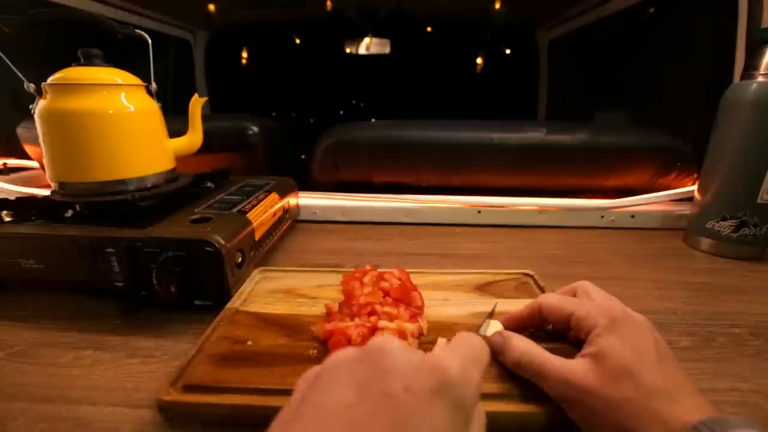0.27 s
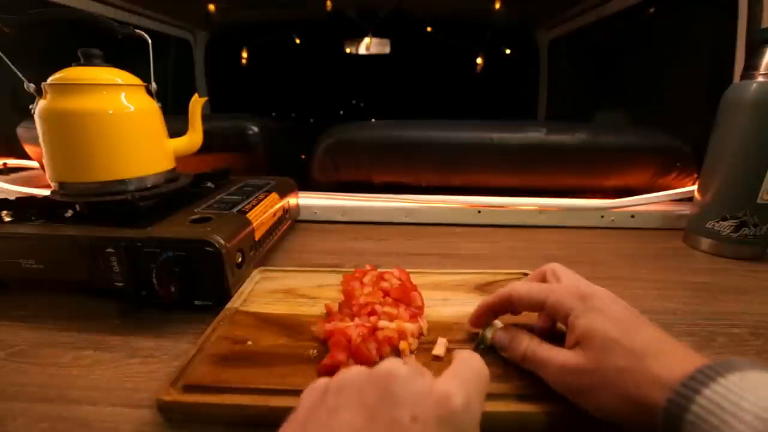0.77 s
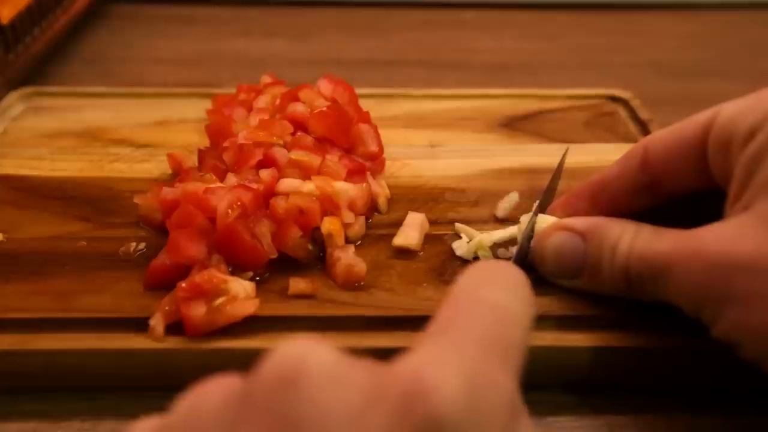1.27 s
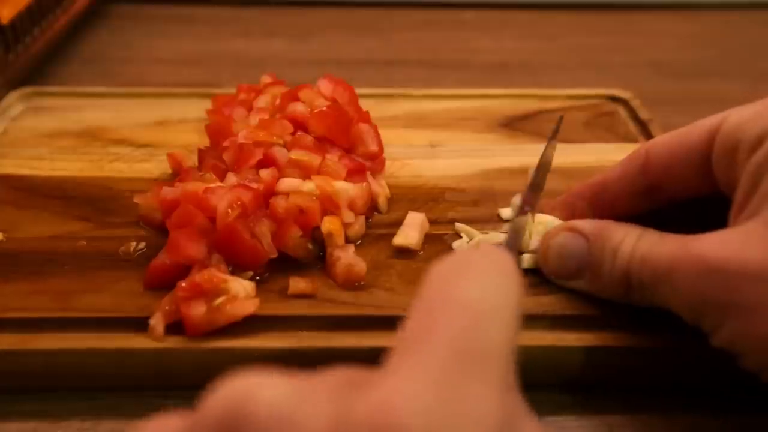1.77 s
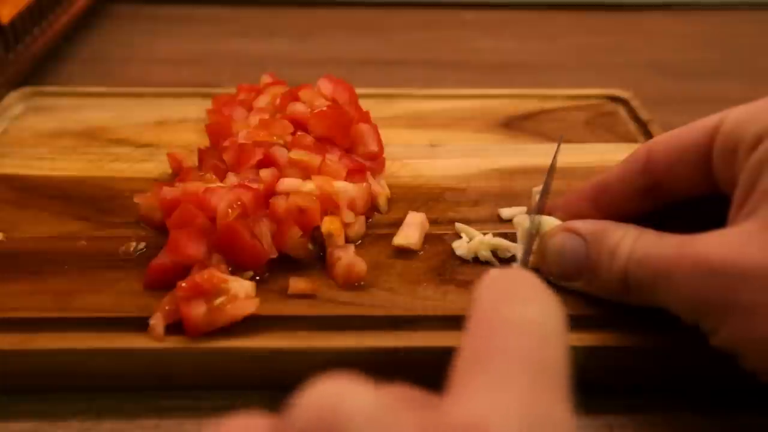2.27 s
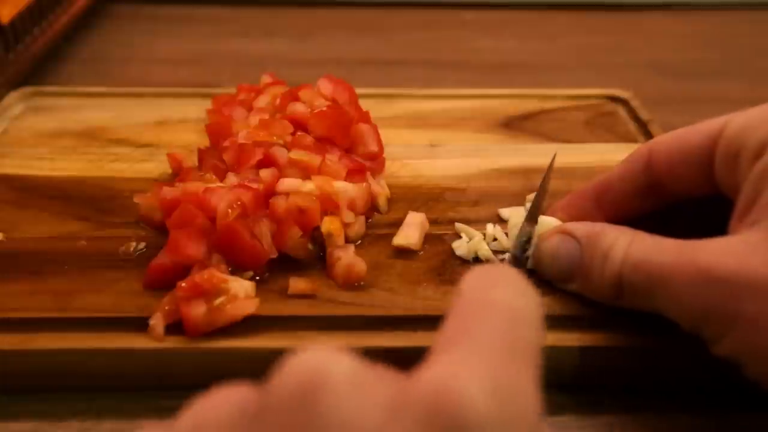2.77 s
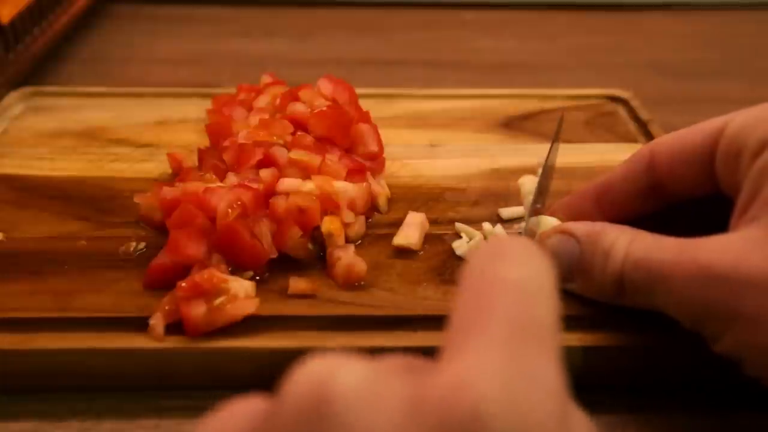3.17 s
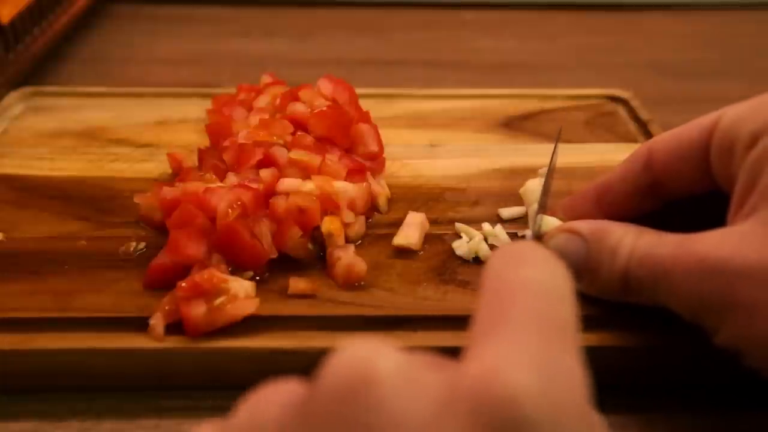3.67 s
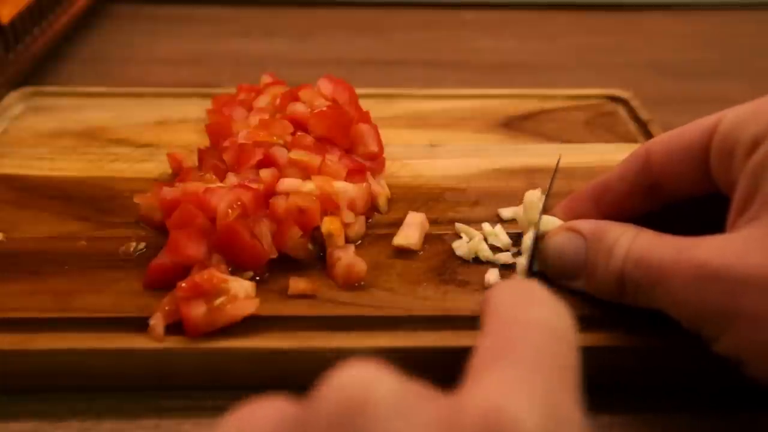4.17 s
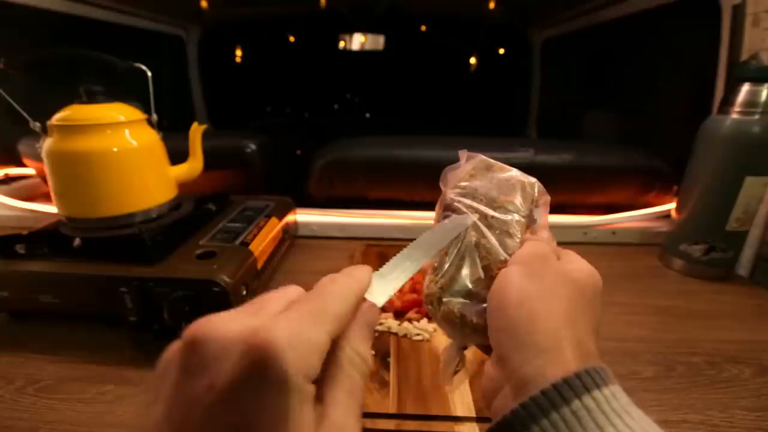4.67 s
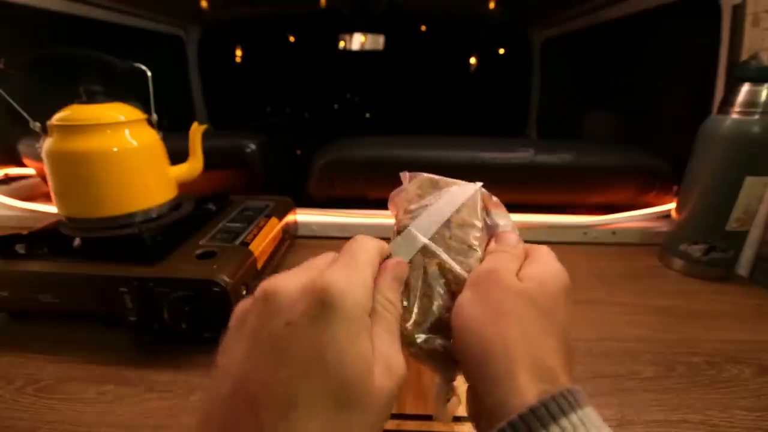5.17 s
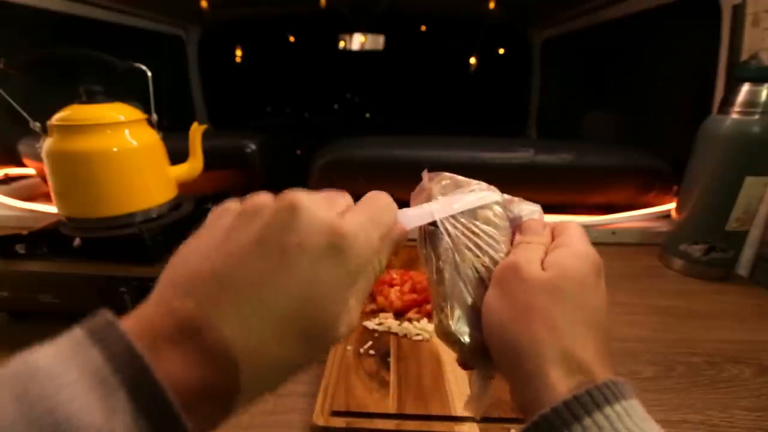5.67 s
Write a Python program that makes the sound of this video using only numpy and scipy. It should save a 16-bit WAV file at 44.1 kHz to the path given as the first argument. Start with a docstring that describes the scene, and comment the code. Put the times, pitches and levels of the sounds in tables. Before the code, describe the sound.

Heavy rain drums steadily on a van roof while a knife knocks sharply on a wooden board, then snaps and rasps into a crinkling plastic bag.

```python
"""Inside the small padded cabin of a parked van, heavy rain drums on the metal roof.
The rain is random impacts that ring damped panels, over a wash of noise.
Close by, a knife crunches through garlic (swells of tiny breaks) and knocks four times on a wooden
board (damped modes and noise bursts). Then the blade snaps and rasps into a plastic food bag, which
crinkles in the hand: flutter bursts with ringing crease, skin and blade, repeated fast in the rasp."""
import sys
import numpy as np
from scipy import signal
from scipy.fft import rfft, irfft
from scipy.io import wavfile

SR = 44100
rng = np.random.default_rng(int(sys.argv[2]) if len(sys.argv) > 2 else 0)


def materialize(psi):
    """Save the field psi as 16-bit PCM at rate SR to the path in sys.argv[1].

    A 1-D psi becomes a single channel; in a 2-D psi each row is a channel.
    """
    bounded = np.clip(np.atleast_2d(psi).T, -1, 1)
    quanta = np.round(bounded * 32767).astype(np.int16)
    wavfile.write(sys.argv[1], SR, quanta)


N = 261513  # length in samples

# spectrum of rain heard through roof and lining: frequency_hz, relative_level_db
ROOF_SPECTRUM = [(30, -30), (90, -23.5), (200, -13), (450, -3), (700, 0.5), (1020, .5), (1500, -6),
                 (2200, -3), (2600, -0.5), (3100, -8), (4200, -19.5), (5000, -26.5), (8000, -37.5),
                 (15500, -45)]
# strength of the shower: time_s, level_db
SHOWER_LEVEL = [(0.0, -37), (2.29, -38), (2.94, -37), (5.05, -39), (5.93, -37)]
# reflections from worktop, window and roof: delay_s, relative_gain
ECHOES = [(.0014, 0.19), (.0031, -0.43), (.0062, .25), (.0084, 0.18)]
# cabin reverberation, nominal decay by 60 dB: frequency_hz, t60_s
CABIN_DECAY = [(100, 0.37), (400, 0.16), (2500, 0.12), (6000, 0.17), (14000, .16)]

# modes of the cutting board on the worktop: frequency_hz, relative_level_db, t60_s
BOARD_MODES = [(336, -9, 0.2), (480, -6.5, 0.1), (576, 2, 0.07), (708, -2, 0.083), (836, -1, 0.057),
               (890, 2, 0.075), (1070, 5, 0.028), (1163, -3.5, 0.06), (1340, -1, 0.074), (1416, 0.5, 0.048),
               (1595, 7, 0.07), (1730, 2, 0.067), (1760, 1.5, 0.061), (1880, 10, 0.078), (2040, 7, .1),
               (2182, 3, 0.14), (2256, -2, 0.048), (2330, -9, 0.026), (2626, 1, .07), (2970, -5, 0.059),
               (3484, -4, 0.079), (4500, -18, .04)]
# spectrum of the blade's clack: frequency_hz, relative_level_db
CLACK_SPECTRUM = [(100, -41.5), (400, -16.5), (1100, -11), (1600, -15.5), (2100, -1), (2500, 3.5),
                  (2900, -7), (3900, -16.5), (5000, -38.5), (8000, -71), (16000, -46)]
# spectrum of the dull push into the worktop: frequency_hz, relative_level_db
THUD_SPECTRUM = [(25, -18), (70, -4), (200, -6.5), (400, 10.5), (900, -41), (4000, -65)]
# spectrum of the steel edge biting into wood: frequency_hz, relative_level_db
BITE_SPECTRUM = [(200, -18), (1500, 6), (3400, -7), (4500, 4.5), (5700, -0.5), (6500, -11), (8000, -13),
                 (11000, -24), (16000, -33)]
# blows on the board: start_s, board_db, board_tilt_db_per_octave, clack_db, thud_db, bite_db
BLOWS = [(0.4054, 12, .5, 22.5, -2.5, -13), (1.2293, 29.5, -2.3, 22.5, 3, 2.5),
         (1.2366, 12, 8, 14.5, 4, -18), (1.302, 2, -3, 4, -6, -25), (2.5216, 18, -0.5, 24.5, 0.5, -14),
         (3.9456, 14, -1.5, 12.5, -4, -20), (5.2752, 11, -3, 6, -7, -15)]

# spectrum of crisp breaks in garlic: frequency_hz, relative_level_db
GARLIC_SPECTRUM = [(200, -45), (1200, -10), (2500, 8.5), (4000, 1.5), (5500, -3.5), (7500, -11),
                   (11000, -13), (16000, -26)]
# garlic breaking under the blade: start_s, level_db, tilt_db_per_octave
GARLIC_CRACKS = [(2.189, -23.5, 3), (2.4803, -28, 7), (3.3453, -14, -4), (3.5535, -5.5, 0),
                 (3.6735, -20, 5), (4.1057, -21.5, 2), (4.1311, -30, 6), (4.3015, -2.5, -1.5)]
# the blade crunches down through the clove before each blow, louder before a hard one
SLICE_S, SLICE_RE_CLACK_DB, SLICE_TILT_DB = .07, -86, 4  # tilt in dB per octave
# one slow cut through a tough clove
SLOW_CUT_AT_S, SLOW_CUT_S, SLOW_CUT_DB = 3.53, .43, -62

# spectrum of taut plastic film giving way: frequency_hz, relative_level_db
FILM_SPECTRUM = [(80, -54), (170, -34), (280, -19), (420, -16), (850, -5.5), (1250, -6.5), (2000, -3.5),
                 (2600, 0.5), (3500, -2), (4400, -7), (5600, -11), (8000, -21.5), (12500, -28),
                 (16000, -39)]
# modes of the blade, damped by the hand and the film: frequency_hz, relative_level_db, t60_s
BLADE_MODES = [(2722, -10, .1), (3123, -11, .1), (3391, -12, .11), (3659, -8, .13), (4228, -13, .12),
               (5200, -19, .08)]
# modes of the taut bag as a drum skin: frequency_hz, relative_level_db, t60_s
SKIN_MODES = [(892, -9.5, 0.056), (1560, -8, .03), (2497, -1.5, 0.014)]
# the bag snapping at the knife point and in the hand:
# start_s, level_db, tilt_db_per_octave, crease_pitch_hz
BAG_SNAPS = [(4.6564, 6, -2.5, 3100), (4.6638, 6.5, -3, 3100), (4.6812, 15.5, -1, 2800),
             (5.058, -6, -1, 3500), (5.0915, -8.5, 1, 3780), (5.295, -5, -3, 3600), (5.343, -6.5, -5, 4600),
             (5.41, 2.5, 2.5, 5200), (5.854, -9, 0, 4530), (5.8631, -2.5, 1, 3860)]
# a brighter snap rings its crease harder and its taut skin less
CREASE_DB_PER_TILT, SKIN_DB_PER_TILT = 1.5, -2
# the film crinkles around each snap, a little more around a strong one
CRINKLE_LEAD_S, CRINKLE_S, CRINKLE_TILT_DB = .014, .055, -3.5
CRINKLE_DB, CRINKLE_DB_PER_DB = -48, .15  # level beside a 0 dB snap; rise per dB of snap
# one pull of the blade through the film: it speeds up, holds, then breaks free and trails off
PULL_AT_S, SPEED_UP_S, PULL_S, TRAIL_S = 4.8583, .049, .071, .035
FIRST_SLIPS_PER_S, TOP_SLIPS_PER_S = 122, 315
# fast slips are smaller than slow ones
PULL_DB, FAST_SLIP_DB, BREAK_FREE_DB, TRAIL_DB_PER_S = 10.3, -3, -9, -300
# the bag's drum note, slack and pulled tight
SLACK_HZ, TIGHT_HZ, SLACK_DB, TIGHT_DB = 215, 285, -9, 3

EDGE_HZ = 16200  # upper band limit


def amp(db):
    """Level: converts decibels to an amplitude ratio."""
    return 10 ** (np.asarray(db) / 20)


def unit(x):
    """Normalisation: scales a signal to an rms of 1."""
    return x / np.sqrt(np.mean(x ** 2) + 1e-20)


def read(points, hz):
    """Interpolation: reads a table along a logarithmic frequency axis."""
    f, value = np.transpose(points)
    return np.interp(np.log(hz + 1), np.log(f + 1), value)


def add(mix, start_s, sound):
    """Superposition: adds a sound into the mix, in place, from its start time."""
    part = mix[max(round(start_s * SR), 0):][:len(sound)]
    part += sound[:len(part)]


def click(spectrum, tilt_db=0, size=4096):
    """Minimum phase: the causal pulse with a given spectrum, tilted in dB per octave about 3.5 kHz."""
    hz = abs(np.fft.fftfreq(size, 1 / SR))
    octaves = np.log2(np.maximum(hz, 500) / 3500)  # the tilt stops below 500 Hz
    log_gain = np.log(amp(read(spectrum, hz) + tilt_db * octaves))
    # the Hilbert transform of the log gain supplies the phase
    response = np.exp(np.conj(signal.hilbert(log_gain)))
    return np.fft.ifft(response).real[:size // 2]


def patter(length, per_s, spread_db):
    """Random point process: impulses of either sign, uneven in size, at a mean rate."""
    size = amp(spread_db * np.minimum(rng.exponential(1, length), 4))
    sign = rng.choice([-1, 1], length)
    struck = rng.random(length) < per_s / SR
    return size * sign * struck


def scatter(t60, size=4096):
    """Diffuse decay: a dense dying burst of energy 1 that favours no pitch; t60 is nominal."""
    age = np.arange(size) / SR / t60
    burst = rng.standard_normal(size) * np.exp(-np.log(1000) * age)
    # keep only the phase, which flattens the spectrum, then fade what is left late
    flat = irfft(np.exp(1j * np.angle(rfft(burst))))
    faded = flat * np.exp(-(2 * age) ** 2)
    return faded / np.linalg.norm(faded)


def burst(spectrum, t60, tilt_db=0):
    """Excitation and response: a coloured pulse smeared into a short diffuse decay."""
    return signal.fftconvolve(click(spectrum, tilt_db), scatter(t60))


def ring(modes, tilt_db=0, rise_s=0.0003):
    """Modal superposition: one impulse sets off damped modes, neighbours in opposite senses."""
    t = np.arange(SR // 4) / SR
    hz, db, t60 = np.transpose(modes)[:, :, None]
    decay = np.log(1000) / t60
    # height grows with damping, so that a level sets the spectral peak; tilt turns about 1 kHz
    height = amp(db + tilt_db * np.log2(hz / 1000)) * 2 * decay / SR
    sense = np.where(np.arange(len(hz)) % 2, -1, 1)
    swings = height * np.exp(-decay * t) * np.sin(2 * np.pi * hz * t)
    return sense @ swings * (1 - np.exp(-t / rise_s))


def crackle(length_s, db, spectrum, tilt_db, grains_per_s, spread_db):
    """Granular fracture: a swell of tiny breaks in one material."""
    n = round(length_s * SR)
    impulses = patter(SR, grains_per_s, spread_db)[:n]
    grains = signal.fftconvolve(impulses, click(spectrum, tilt_db))[:n]
    return amp(db) * unit(grains) * signal.windows.tukey(n, .6)


def rain(drops_per_s=260, spread_db=2.5, panel_t60=0.032, wash_db=-2, count=12):
    """Impact excitation of damped panels, each ringing its own way, over a wash of countless small drops."""
    t = np.arange(SR // 8) / SR
    drops = np.zeros(N)
    for _ in range(count):
        panel = rng.standard_normal(len(t)) * np.exp(-np.log(1000) * t / panel_t60)
        impacts = patter(N + len(t), drops_per_s, spread_db)
        drops += signal.oaconvolve(impacts, unit(panel), "valid")[:N]
    drumming = unit(drops) + amp(wash_db) * rng.standard_normal(N)
    inside = signal.oaconvolve(drumming, click(ROOF_SPECTRUM))[:N]
    level_db = np.interp(np.arange(N) / SR, *np.transpose(SHOWER_LEVEL))
    return unit(inside) * amp(level_db)


def cabin(x, echo_db, tail_db, gap_s=.005):
    """Room response: close reflections and a short tail, whose decay depends on frequency."""
    longest = max(t60 for _, t60 in CABIN_DECAY)
    hz, t, z = signal.stft(scatter(longest, size=16384), SR, nperseg=256)
    # the tail already dies at the longest rate: add only the remaining damping
    damping = np.log(1000) * (1 / read(CABIN_DECAY, hz) - 1 / longest)
    tail = signal.istft(z * np.exp(-damping[:, None] * t), SR, nperseg=256)[1]
    response = signal.unit_impulse(len(tail))  # the direct sound
    add(response, gap_s, amp(tail_db) * tail / np.linalg.norm(tail))
    for delay_s, gain in ECHOES:
        add(response, delay_s, amp(echo_db) * np.array([gain]))
    return signal.oaconvolve(x, response)[:N]


def garlic(break_t60=.008, grains_per_s=600, spread_db=3.5):
    """Brittle fracture: the clove crunches softly under the blade and now and then splits with a crack."""
    def crunch(length_s, db):
        """Granular fracture: a swell of breaks in the clove."""
        return crackle(length_s, db, GARLIC_SPECTRUM, SLICE_TILT_DB, grains_per_s, spread_db)

    out = np.zeros(N)
    add(out, SLOW_CUT_AT_S, crunch(SLOW_CUT_S, SLOW_CUT_DB))
    for start_s, _, _, clack_db, _, _ in BLOWS:
        add(out, start_s - SLICE_S, crunch(SLICE_S, clack_db + SLICE_RE_CLACK_DB))
    for start_s, db, tilt_db in GARLIC_CRACKS:
        add(out, start_s, amp(db) * burst(GARLIC_SPECTRUM, break_t60, tilt_db))
    return out


def knocks(chatter_t60=0.027, thud_t60=.11, bite_t60=0.034):
    """Impact: the edge bites the wood, the blade chatters, the board rings and the worktop thuds."""
    out = np.zeros(N)
    # a hard chop lands twice, tip then heel, and settles with a light tap;
    # the last blow is a soft bump of the hand
    for start_s, board_db, tilt_db, clack_db, thud_db, bite_db in BLOWS:
        add(out, start_s, amp(board_db) * ring(BOARD_MODES, tilt_db, rise_s=0.0012))
        add(out, start_s, amp(clack_db) * burst(CLACK_SPECTRUM, chatter_t60))
        add(out, start_s, amp(thud_db) * burst(THUD_SPECTRUM, thud_t60))
        add(out, start_s, amp(bite_db) * burst(BITE_SPECTRUM, bite_t60))
    return out


def snap(tilt_db, skin_db, blade_db, crease_hz, crease_db, crease_t60, flutter_t60=0.0042):
    """Release of tension: the film flutters briefly; the crease, the taut skin and the blade ring."""
    skin = amp(skin_db) * ring(SKIN_MODES)
    blade = amp(blade_db) * ring(BLADE_MODES)
    out = skin + blade + ring([(crease_hz, crease_db, crease_t60)])
    add(out, 0, burst(FILM_SPECTRUM, flutter_t60, tilt_db))
    return out


def bag(crease_db=0, crease_t60=.005):
    """Buckling film: it crinkles and gives way in single snaps; the bright ones barely move the bag."""
    out = np.zeros(N)
    for start_s, db, tilt_db, crease_hz in BAG_SNAPS:
        sound = snap(tilt_db, skin_db=-2 + SKIN_DB_PER_TILT * tilt_db, blade_db=-7, crease_hz=crease_hz,
                     crease_db=crease_db + CREASE_DB_PER_TILT * max(tilt_db, 0), crease_t60=crease_t60)
        add(out, start_s, amp(db) * sound)
        crinkle_db = CRINKLE_DB + CRINKLE_DB_PER_DB * db
        crinkle = crackle(CRINKLE_S, crinkle_db, FILM_SPECTRUM, CRINKLE_TILT_DB,
                          grains_per_s=700, spread_db=4)
        add(out, start_s - CRINKLE_LEAD_S, crinkle)
    return out


def rasp(uneven_db=1, tilt_db=0.25, drum_t60=.022):
    """Stick-slip: each slip snaps the film and drums the bag, whose pitch rises as it is pulled tight."""
    out, t = np.zeros(N), 0
    while t < PULL_S + TRAIL_S:
        tension = min(t / SPEED_UP_S, 1)
        free_s = max(t - PULL_S, 0)  # time since the blade broke free
        level_db = PULL_DB + FAST_SLIP_DB * tension
        level_db += BREAK_FREE_DB * (free_s > 0) + TRAIL_DB_PER_S * free_s
        drum_hz = SLACK_HZ + (TIGHT_HZ - SLACK_HZ) * tension
        drum_db = SLACK_DB + (TIGHT_DB - SLACK_DB) * tension
        slip = snap(tilt_db, skin_db=7.5, blade_db=2, crease_hz=3290, crease_db=1.5, crease_t60=0.006)
        slip += ring([(drum_hz, drum_db, drum_t60)], rise_s=0.006)
        add(out, PULL_AT_S + t, amp(level_db + uneven_db * rng.standard_normal()) * slip)
        speed = tension * (1 - free_s / TRAIL_S)
        t += 1 / (FIRST_SLIPS_PER_S + (TOP_SLIPS_PER_S - FIRST_SLIPS_PER_S) * speed)
    return out


def scene():
    """Superposition of sources: rain overhead, kitchen work in front."""
    chopping = cabin(knocks() + garlic(), echo_db=-8, tail_db=-6)
    opening = cabin(bag() + rasp(), echo_db=-3, tail_db=-7.5)
    return (rain() + chopping + opening)[None]


def record(dry):
    """Soft saturation rounds off the loudest peaks; a low-pass filter then limits the band."""
    ceiling = .9
    rounded = ceiling * np.tanh(dry / ceiling)
    low_pass = signal.firwin(401, EDGE_HZ, window=("kaiser", 9), fs=SR)
    return signal.oaconvolve(rounded, low_pass[None], "same")


dry = scene()
out = record(dry)
materialize(out)
```